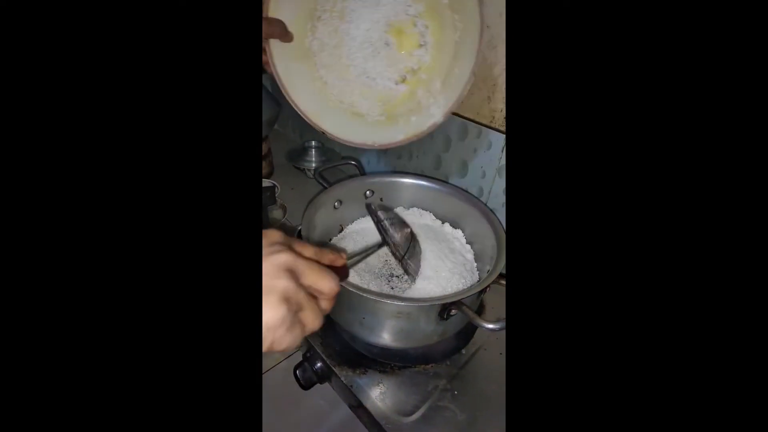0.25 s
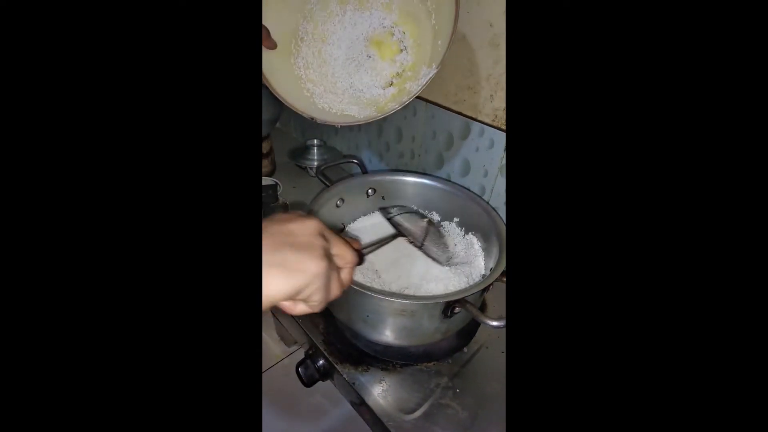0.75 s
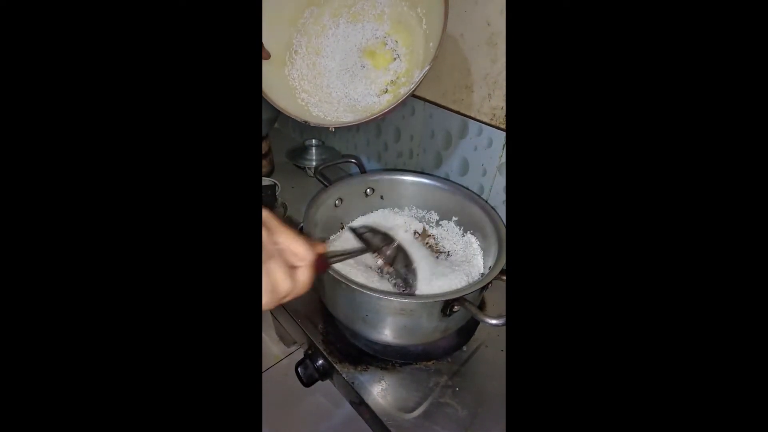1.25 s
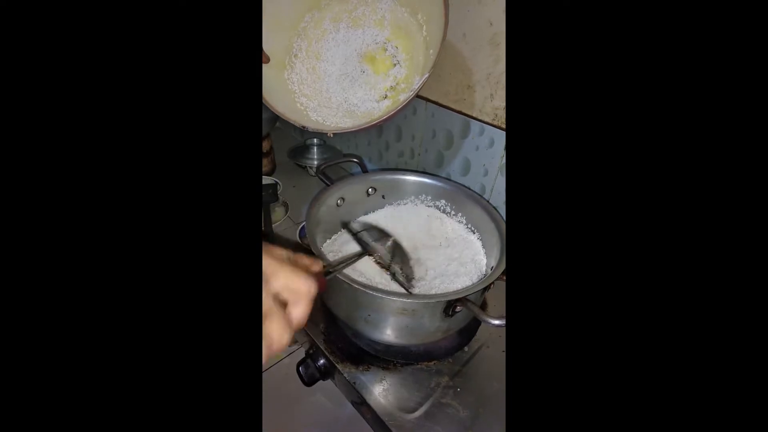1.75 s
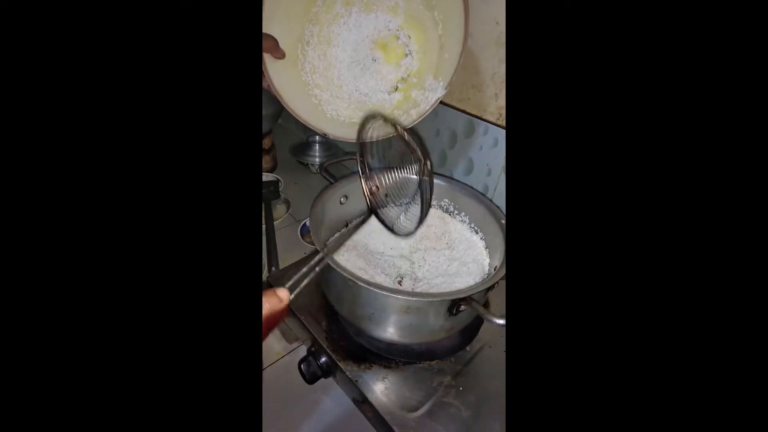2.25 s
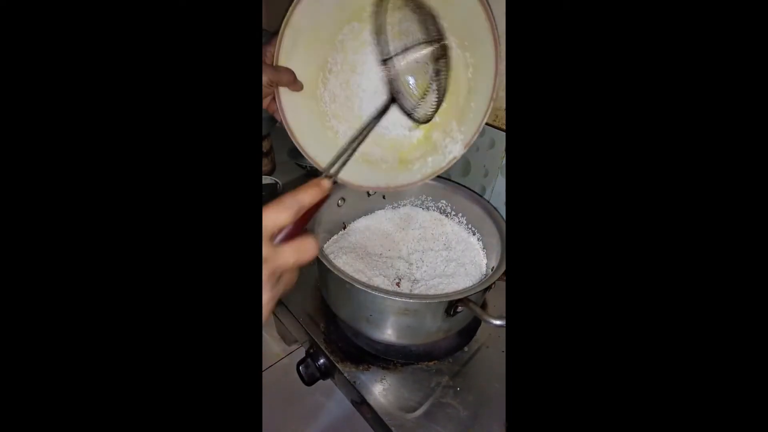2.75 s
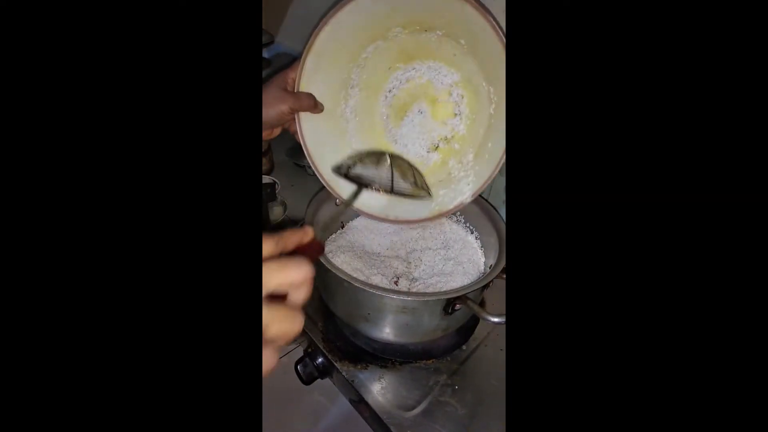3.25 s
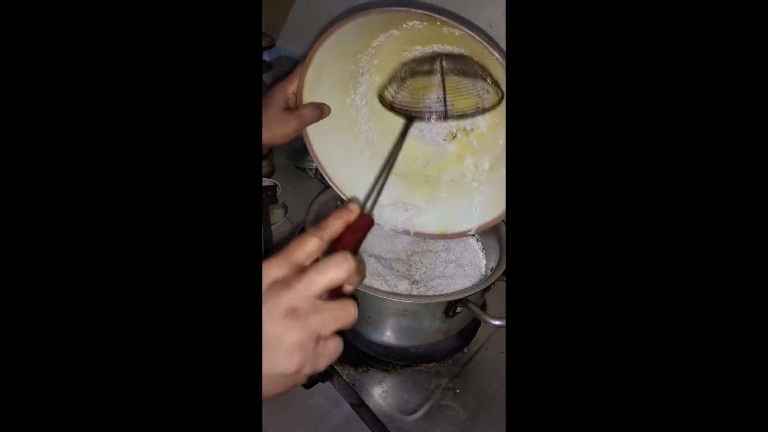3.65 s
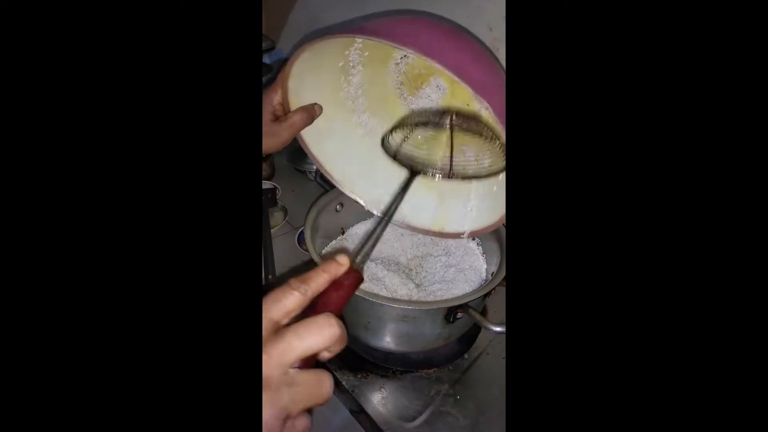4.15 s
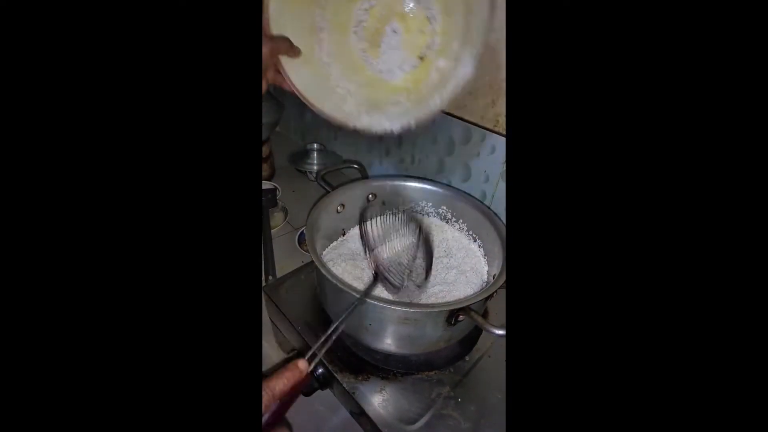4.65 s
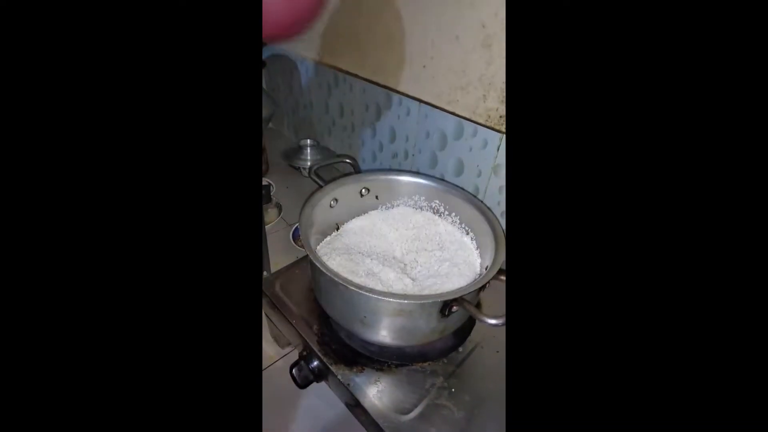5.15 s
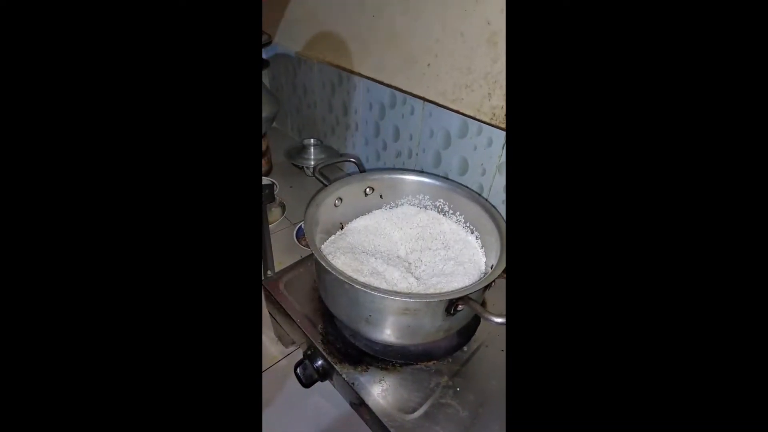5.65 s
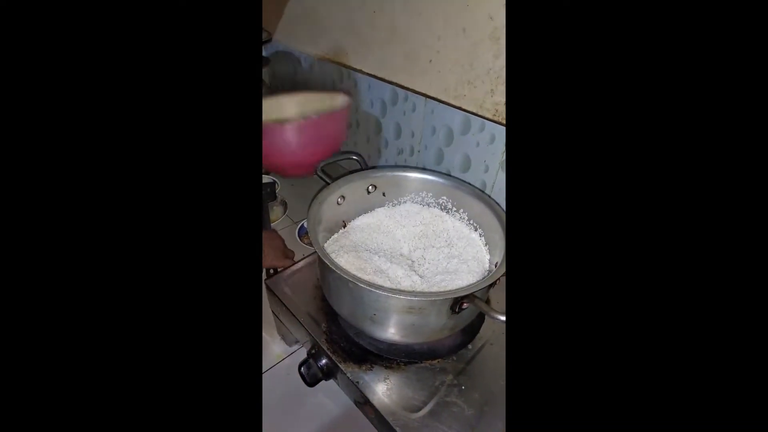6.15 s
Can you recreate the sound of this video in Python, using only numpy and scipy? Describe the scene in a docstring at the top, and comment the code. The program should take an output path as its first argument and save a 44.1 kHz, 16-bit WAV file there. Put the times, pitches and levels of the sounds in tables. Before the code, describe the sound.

Wet rice and spices fry noisily in a steel pot on a gas stove, full of fine spitting clicks and tiny bubble pings. A wire-mesh ladle stirs lightly, bangs the rim twice with a jingling clang, scratches a plastic bowl, then bangs twice again. The sizzle gradually weakens, leaving soft burner roar and a few last clicks. Close stereo pickup, small reflective kitchen.

```python
"""In a small hard kitchen, rice and spices fry in a steel pot on a gas stove, near a phone with two microphones.
The burner roars softly (shaped noise) with hollow tones (resonances) and a low hum (a wavering sine).
A wire ladle stirs, is knocked clean on the rim and scrapes a plastic bowl: uneven clicks set pot, mesh and
bowl ringing, and low notes, squeaks, snaps and ticks are short fading tones or noises.
Steam bubbles burst in the frying oil: thousands of small clicks and short rising pings."""
import sys
import numpy as np
from scipy import signal
from scipy.fft import rfft, irfft
from scipy.io import wavfile
from scipy.ndimage import uniform_filter1d

SR = 44100
rng = np.random.default_rng(int(sys.argv[2]) if len(sys.argv) > 2 else 0)


def master_out(mix):
    """Clip the mix to full scale and print it as 16-bit PCM to the path in sys.argv[1]."""
    frames = np.transpose(np.atleast_2d(mix))
    ceiling = np.clip(frames, -1, 1)
    pcm = np.round(ceiling * 32767).astype(np.int16)
    wavfile.write(sys.argv[1], SR, pcm)


N = 282240  # samples in the scene


def undb(db):
    """Turn decibels into a plain gain."""
    return 10 ** (np.asarray(db) / 20)


def unit(x):
    """Scale to an average (RMS) level of 1."""
    return x / np.sqrt(np.mean(x ** 2))


def curve(rows):
    """Draw lines through a table that starts with t/s; gives each other column at every sample."""
    s, *columns = np.transpose(rows)
    t = np.arange(N) / SR
    return [np.interp(t, s, c) for c in columns]


def along(points, column=1):
    """Read a column of a table that starts with f/Hz at every frequency of the spectrum."""
    p = np.array(points, float)
    hz = np.arange(N // 2 + 1) * SR / N
    return np.interp(np.log(hz + 1), np.log(p[:, 0]), p[:, column])


def colour(x, points):
    """Give a sound the tone colour of an f/Hz, level/dB table."""
    return unit(irfft(rfft(x) * undb(along(points)), N))


def band(x, lo_hz, hi_hz, order=2):
    """Keep mainly the pitches between two edges."""
    return signal.sosfilt(signal.butter(order, [lo_hz, hi_hz], "band", fs=SR, output="sos"), x)


def ring(x, modes):
    """Let a sound excite several resonances, neighbours in opposite sign."""
    total = 0
    for k, (hz, width_hz, db) in enumerate(modes):
        resonance = signal.lfilter(*signal.iirpeak(hz, hz / width_hz, SR), x)
        total = total + (-1) ** k * undb(db) * resonance
    return unit(total)


def walk(rate):
    """Wander at random: levels held for 1 / rate s, then smoothed twice; spread 1."""
    k = int(SR / rate)
    steps = np.repeat(rng.standard_normal(N // k + 1), k)
    return unit(uniform_filter1d(uniform_filter1d(steps, k), k)[:N])


def grains(per_s, spread_db, smear_s):
    """Clicks of very unequal size with short noisy tails; both paths share the clicks but not the noise."""
    loudness = np.minimum(rng.exponential(size=N), 4.5)
    size = (rng.random(N) < per_s / SR) * undb(spread_db * loudness)
    power = signal.lfilter([1], [1, -np.exp(-1 / (smear_s * SR))], size ** 2)
    return unit(np.sqrt(power) * rng.standard_normal((2, N)))


def burst(t0, db, rise_s, hold_s, t60):
    """Loudness shape of one event: quick rise, plateau, then a decay of 60 dB in t60 seconds."""
    out, first = np.zeros(N), int(t0 * SR) + 1
    t = np.arange(first, min(N, first + int((hold_s + 2 * t60) * SR))) / SR - t0
    decay_db = 60 * np.maximum(t - hold_s, 0) / t60
    out[first:first + len(t)] = undb(db - decay_db) * (1 - np.exp(-t / rise_s))
    return out


# Tone colour of the gas roar: f/Hz, level/dB (per Hz)
ROAR_TONE = [(15, -57), (30, -15), (87, -3), (141, 0.5), (224, -5), (251, -4.5), (357, -1.5), (477, -32),
             (510, -12), (969, -4.5), (1410, -8), (1610, 3), (5000, -19.5), (6500, -82), (11000, -120)]
# Level of the gas roar, before its random wander: t/s, level/dB
ROAR_LEVEL = [(0.0, -47.5), (1.2, -46), (2.0, -45.5), (3.5, -45.5), (5.0, -47), (5.7, -46), (6.4, -43.5)]


def gas_roar(noise):
    """Burning gas gives a steady noise whose level wanders a little."""
    return undb(curve(ROAR_LEVEL)[0] + 1.8 * walk(6)) * colour(noise, ROAR_TONE)


# Hollow tones under the pot, before their random wander: f/Hz, width/Hz, level/dB
FLAME_TONES = [(128, 9.6, -61.5), (359, 14, -72), (458, 16, -59), (514.7, 24, -58), (1027, 67, -58.5)]


def flame_tones(noise):
    """The roar's noise excites a few hollow resonances, each wavering in level."""
    return sum(undb(db + 2.5 * walk(7.9)) * ring(noise, [(hz, width, 0)]) for hz, width, db in FLAME_TONES)


# One hollow tone that comes and goes: t/s, level/dB
HOLLOW_LEVEL = [(0.0, -63), (0.27, -48.5), (0.33, -63), (0.46, -59), (0.52, -46.5), (0.72, -52.5),
                (1.1, -52), (1.3, -57), (1.4, -59.5), (1.94, -56), (3.6, -56.5), (5.3, -61.5), (6.4, -61)]


def hollow_tone(noise):
    """The same noise passes through two close resonances, one after the other."""
    narrow = ring(noise, [(259.7, 12.5, 0)])
    return undb(curve(HOLLOW_LEVEL)[0]) * ring(narrow, [(276, 51, 0)])


# Level of the low hum, before swells and random wander: t/s, level/dB
HUM_LEVEL = [(0.0, -54), (0.18, -69), (0.3, -58), (0.55, -71), (0.66, -52), (0.85, -52), (1.01, -67),
             (1.22, -62), (1.32, -50), (1.55, -49), (1.72, -67), (2.1, -73), (3.12, -57), (3.4, -65),
             (3.9, -49), (4.1, -63), (4.6, -55), (5.6, -66), (6.4, -61)]
HUM_HZ = 89.7
HARD_BLOW_DB, SWELL_DB = -33, -21  # thuds above the first start a swell; swell against the thud
SWELL_RISE_S, SWELL_HOLD_S, SWELL_T60_S = 0.16, 0.19, 0.53


def hum():
    """A sine wavers in pitch and level; hard blows and rocking of the pot make it swell."""
    blows = [(row[0], row[2]) for row in KNOCKS if row[2] > HARD_BLOW_DB]
    blows += [row[:2] for row in ROCKING]
    swell = sum(burst(s, db + SWELL_DB, SWELL_RISE_S, SWELL_HOLD_S, SWELL_T60_S) for s, db in blows)
    level = (undb(curve(HUM_LEVEL)[0]) + swell) * undb(2.2 * walk(11))
    turns = np.cumsum(HUM_HZ * (1 + 0.015 * walk(14))) / SR
    return level * np.sqrt(2) * np.sin(2 * np.pi * turns)


def burner():
    """Gas roar and hollow tones come from one shared noise, with the low hum added."""
    noise = rng.standard_normal((2, N))
    return gas_roar(noise) + flame_tones(noise) + hum() + hollow_tone(noise)


# The wire squeaks on the bowl: t/s, level/dB, f/Hz, length/s
SQUEAKS = [(4.218, -36.5, 1700, 0.028), (4.224, -39, 2600, 0.012), (4.278, -32.5, 1817, 0.015),
           (4.34, -35, 1760, 0.013)]


def squeaks():
    """Rubbing wire gives nearly pure notes whose pitch wavers slightly."""
    t, waver = np.arange(N) / SR, np.cumsum(walk(150)) / SR
    out = 0
    for s, db, hz, length in SQUEAKS:
        note = np.sqrt(2) * np.sin(2 * np.pi * hz * (t + 0.0134 * waver))
        out = out + burst(s, db, 0.003, length, 0.045) * note
    return out


# Strokes of the ladle over the bowl: t/s, length/s, wall level/dB, rasp level/dB, scratch level/dB
SCRAPES = [(2.921, 0.064, -40.5, -39, -37), (2.996, 0.084, -49, -59, -49), (3.091, 0.07, -43, -35, -39),
           (3.157, 0.14, -40, -39.5, -39), (3.631, 0.087, -41.5, -42, -43), (3.704, 0.018, -28, -30, -29),
           (3.809, 0.031, -28.5, -32, -35), (3.868, 0.097, -49, -35, -41.5), (4.19, 0.16, -49, -41, -38)]
# Drumming of the bowl wall: f/Hz, width/Hz, level/dB
BOWL_WALL = [(210, 130, -4.5), (300, 83, 1.5), (474, 40, 3), (638, 86, 0.5)]
# Rasp of the bowl: f/Hz, width/Hz, level/dB
BOWL_RASP = [(1640, 100, -7), (1735, 570, 11), (2180, 190, 7)]
# Scratch above the rasp: f/Hz, width/Hz, level/dB
BOWL_SCRATCH = [(2590, 110, 10), (2740, 22, 16), (3050, 150, 5), (3600, 260, 7), (4430, 190, 7)]
SCRAPE_RISE_S, SCRAPE_T60_S = 0.012, 0.22


def scrapes():
    """Wire catches and slips on plastic: uneven clicks drive the bowl's resonances."""
    slips = grains(900, 2.2, 0.002)
    parts = [ring(slips, modes) for modes in (BOWL_WALL, BOWL_RASP, BOWL_SCRATCH)]
    out = 0
    for s, length, *levels in SCRAPES:
        for db, part in zip(levels, parts):
            out = out + burst(s, db, SCRAPE_RISE_S, length, SCRAPE_T60_S) * part
    return out


# Single low notes of pot and bowl, ringing at and after knocks and scrapes: t/s, level/dB, f/Hz, t60/s
LOW_NOTES = [(0.766, -32, 255, 0.14), (0.770, -33, 450, 0.073), (0.806, -38, 465, 0.073),
             (1.174, -34.5, 384, 0.34), (1.176, -40.5, 219, 0.18), (1.212, -43, 615, 0.82),
             (2.141, -18, 728, 0.067), (2.203, -23, 312, 0.14), (2.154, -28, 304, 0.34),
             (2.461, -27, 399, 0.28), (2.165, -30, 768, 0.34), (2.215, -28, 666, 0.5),
             (2.465, -31, 808, 0.36), (2.545, -22, 320, 0.18), (2.55, -46, 680, 0.43),
             (4.765, -24, 301, 0.34), (4.815, -31, 613, 0.44), (3.826, -31, 643, 0.29),
             (3.855, -38, 647, 0.13), (4.963, -26, 290, 0.18), (2.441, -22.5, 700, 0.08),
             (2.502, -26, 297.6, 0.34), (3.184, -37, 302, 0.07), (3.198, -45, 282, 0.065),
             (3.232, -33, 620, 0.18), (3.269, -35, 322, 0.11), (3.702, -30.5, 126, 0.3),
             (3.822, -26.5, 303, 0.28), (4.186, -27, 195, 0.046), (4.189, -35, 390, 0.11),
             (4.252, -29, 250, 0.078), (4.718, -32, 586, 0.089), (4.734, -26.5, 582, 0.32),
             (4.733, -27.5, 301.5, 0.3), (4.952, -26.5, 530, 0.15), (4.979, -20.5, 470, 0.2),
             (2.66, -35, 301, 0.32), (2.7, -38, 399, 0.26), (5.11, -32, 473, 0.2), (5.15, -30, 301, 0.3),
             (5.550, -28, 504, 0.09), (5.592, -29.5, 505, 0.13), (6.256, -44, 400, 0.1),
             (6.29, -46, 432, 0.08)]


def low_notes():
    """Each is one low fading note, a quarter turn apart on the two paths."""
    t, paths = np.arange(N) / SR, np.array([[0], [np.pi / 2]])
    out = 0
    for s, db, hz, t60 in LOW_NOTES:
        note = np.sqrt(2) * np.sin(2 * np.pi * hz * (t - s) + paths)
        out = out + burst(s, db, 0.00081, 0, t60) * note
    return out


# Sharp clicks of wire on pot and bowl, level before the fade: t/s, level/dB, f/Hz
SNAPS = [(2.4315, -12, 6100), (2.432, -9, 8200), (4.711, -14, 6400), (4.947, -11, 6300), (6.11, -30, 2500),
         (6.216, -28, 1700), (6.302, -34, 2000), (3.11, -27, 2030), (3.152, -19, 2600), (3.176, -27, 4430),
         (3.7014, -15.5, 327), (3.702, -13, 3600), (3.702, -17, 2050), (3.721, -23, 2050),
         (3.726, -28, 1630), (3.836, -25, 1710), (4.187, -23, 1700), (4.187, -23, 2800), (4.233, -28, 1700),
         (5.501, -21, 1390), (5.551, -15, 2100), (5.551, -18, 5900), (5.568, -20, 5780)]
SNAP_CYCLES = 1.6  # the fade falls to 37 % in this many cycles


def snaps():
    """A hard contact gives a couple of cycles, gone at once."""
    out = np.zeros(N)
    for s, db, hz in SNAPS:
        cycles = np.arange(int(8 * SR / hz)) * hz / SR
        click = undb(db) * np.sin(2 * np.pi * cycles) * np.exp(-cycles / SNAP_CYCLES)
        out[int(s * SR):int(s * SR) + len(click)] += click
    return out


# Small ticks and pings, alone or within knocks and scrapes, level before the common gain of 0.62:
# t/s, level/dB, f/Hz, t60/s
TICKS = [(0.049, -32, 8380, 0.059), (0.688, -21, 9000, 0.055), (0.9294, -21, 7700, 0.05),
         (1.164, -18.5, 4530, 0.06), (1.164, -20, 5400, 0.06), (2.0368, -17, 7350, 0.044),
         (2.197, -18, 2200, 0.028), (2.197, -15, 1850, 0.026), (2.431, -16, 6140, 0.061),
         (2.7382, -34, 7400, 0.019), (3.11, -27, 2550, 0.069), (3.1502, -27, 2580, 0.26),
         (3.9828, -30, 1700, 0.072), (5.55, -21, 5930, 0.088), (3.195, -28, 4440, 0.15),
         (4.4258, -26, 6300, 0.21), (5.9094, -26, 6400, 0.18), (0.845, -23, 5870, 0.05),
         (1.344, -24, 4270, 0.04), (1.512, -28, 4380, 0.036), (1.795, -23, 5820, 0.04),
         (0.745, -35, 2280, 0.08), (0.926, -30, 2400, 0.05), (6.256, -40, 1450, 0.12),
         (6.287, -36, 1600, 0.15), (6.29, -35, 2000, 0.12)]


def ticks():
    """Each is a short fading burst of noise in a narrow band around one pitch."""
    noise = rng.standard_normal((2, N))
    out = 0
    for s, db, hz, t60 in TICKS:
        narrow = unit(band(noise, hz / 1.072, hz * 1.055))
        out = out + burst(s, db, 0.00036, 0.0017, t60) * 0.62 * narrow
    return out


# Ladle knocks: t/s, mesh jingle level/dB, thud level/dB, clank level/dB, crack level/dB (before its filter),
# rattle time/s, then middle and upper pot ring against the thud: level/dB, level/dB
KNOCKS = [(0.742, -45, -35.5, -41, -24.5, 0.014, 6, -1.5), (1.161, -30, -35.5, -35.5, -25, 0.069, -4, 2),
          (2.129, -25, -17.5, -28.5, -47, 0.12, 3.5, 1.5), (2.431, -26, -19, -26.5, -40, 0.1, 1, 1.5),
          (3.701, -39, -32.5, -28, -17, 0.019, 0, 6.5), (3.819, -43, -47, -39, -33, 0.022, -8, 3),
          (4.185, -58, -33.5, -35, -28, 0.006, -13, -10), (4.71, -25, -21.5, -30, -37, 0.061, 1, 2.5),
          (4.942, -26, -24, -29.5, -48, 0.077, 5.5, -1), (5.499, -35, -37, -32, -25, 0.027, -1, 3.5),
          (5.548, -29.5, -41.5, -32.5, -16.5, 0.04, -8, 6.5), (6.252, -56, -51, -44, -34, 0.024, 5, -10)]
# The pot rocks on after the second blow of a pair: t/s, thud level/dB, clank level/dB, length/s
ROCKING = [(2.59, -35.5, -45, 0.038), (5.069, -32, -39, 0.085)]
# Low ring of the pot: f/Hz, width/Hz, level/dB
POT_RING = [(133.5, 12, -5), (252.6, 37, 3), (302.6, 10.4, 8.5), (352.7, 13.6, 1.5), (396, 21, -3.5),
            (454.5, 10, 4), (564, 67, -11), (615, 24, -3), (666, 32, -5.5), (762, 62, -4.5),
            (864, 17, -18.5)]
# Clank of the rim: f/Hz, width/Hz, level/dB
RIM_RING = [(1051, 36, 4), (1255, 30, 6), (1359, 25, 9), (1550, 55, 4.5), (1753, 42, 5), (1967, 33, 2.5),
            (2215, 37, 9.5), (2417, 61, 0.5), (2740, 53, 3), (3110, 70, 3)]
# Tone colour of the mesh: f/Hz, level/dB (per Hz)
MESH_TONE = [(1650, -12.5), (2800, -43), (3310, -1), (4170, 9), (5370, -3), (5950, -5), (8420, 7.5),
             (11300, -28), (12400, -11), (15800, -20)]
# Ring of the mesh wires: f/Hz, width/Hz, level/dB
WIRE_RING = [(3920, 81, -32), (4930, 70, 7.5), (5864, 370, 4), (6460, 81, 12), (6760, 380, 0),
             (8080, 390, 9.5), (8820, 370, 5.5), (9420, 840, 2)]
# Tone colour of the thud: f/Hz, level/dB (per Hz)
THUD_TONE = [(24, -50), (40, -20), (102, 10), (186, -7), (285, -4), (447, 0), (1350, -6), (1450, -22),
             (2190, 6.5), (3500, -35), (4550, -51), (7700, -120)]
# Edges of the deep, middle and upper pot ring: f/Hz
POT_EDGES = 30, 375, 520, 1500
THUD_LAG, THUD_RISE = 0.14, 0.045  # shares of the rattle time, stretched for each part below
THUD_T60_S, JINGLE_T60_S = 0.5, 0.23
ROCK_RISE_S, ROCK_T60_S = 0.032, 0.37


def knocks():
    """The mesh cracks and jingles at once; pot and stove top shudder a moment later and rattle on."""
    # loudness of each part over time
    jingle, ping, upper, middle, deep, clank, crack = 0, 0, 0, 0, 0, 0, 0
    for s, jingle_db, thud_db, clank_db, crack_db, rattle, middle_db, upper_db in KNOCKS:
        lag, rise = THUD_LAG * rattle, THUD_RISE * rattle
        crack = crack + burst(s, crack_db, 0.00036, 0.0007, 0.078)
        ping = ping + burst(s, jingle_db + 6.5, 0.00046, 0.0063, 0.34)
        jingle = jingle + burst(s, jingle_db, 0.0055, 0.71 * rattle, JINGLE_T60_S)
        upper = upper + burst(s + lag, thud_db + upper_db, rise, rattle, THUD_T60_S)
        middle = middle + burst(s + 1.5 * lag, thud_db + middle_db, 12.0 * rise, 0.89 * rattle, THUD_T60_S)
        # the lowest ring builds up slowly
        deep = deep + burst(s + 0.41 * lag, thud_db, 15 * rise, 0.86 * rattle, 1.11 * THUD_T60_S)
        clank = clank + burst(s + lag, clank_db, 1.3 * rise, 0.65 * rattle, 0.92 * THUD_T60_S)
    for s, thud_db, clank_db, length in ROCKING:
        rock = burst(s, thud_db, ROCK_RISE_S, length, ROCK_T60_S)
        upper, middle, deep = upper + undb(2) * rock, middle + rock, deep + rock
        clank = clank + burst(s, clank_db, ROCK_RISE_S, length, ROCK_T60_S)

    # sound of each part
    shake = grains(1200, 1.2, 0.004)
    chatter = grains(700, 1.6, 0.004)
    pot = unit(ring(shake, POT_RING) + undb(-8) * colour(shake, THUD_TONE))
    deep_pot, middle_pot, upper_pot = (band(pot, lo, hi) for lo, hi in zip(POT_EDGES, POT_EDGES[1:]))
    rim = unit(ring(shake, RIM_RING) + undb(-5) * unit(band(chatter, 670, 3100)))
    wires = ring(chatter, WIRE_RING)
    mesh = unit(colour(chatter, MESH_TONE) + undb(-5) * wires)
    strike = 1.03 * band(crack * rng.standard_normal((2, N)), 170, 6500, order=1)

    pot_sound = deep * deep_pot - middle * middle_pot + upper * upper_pot
    return strike + ping * wires + jingle * mesh + pot_sound + clank * rim


PINGS_PER_S, PING_T60_S = 1200, 0.14
PING_GLIDE = 0.083  # share by which the pitch would rise in one t60; each note is cut sooner


def pings():
    """Small bubbles: short fading notes from 1.2 to 15.6 kHz, each rising a little in pitch."""
    at, pitch, size, phase_a, phase_b = rng.random((int(PINGS_PER_S * N / SR), 5)).T
    k = np.arange(1500)  # samples in a note
    fade = k / (PING_T60_S * SR)
    hz = 1200 * 13 ** pitch
    turn = 2 * np.pi * hz[:, None] * k / SR * (1 + PING_GLIDE * fade / 2)
    loudness = np.sqrt(hz) * undb(-2.0 * np.log(size + 0.0092))  # a few are much louder
    shape = undb(-60 * fade) * (1 - np.exp(-k / 40)) * (1 - k / len(k))
    gain = loudness[:, None] * shape
    where = ((at * N).astype(int)[:, None] + k).ravel()
    paths = []
    for phase in (phase_a, phase_b):
        notes = gain * np.sin(turn + 2 * np.pi * phase[:, None])
        paths.append(np.bincount(where, notes.ravel(), N)[:N])
    return unit(np.array(paths))


def flicker(rate):
    """A random wander without its slow part."""
    x = walk(rate)
    return unit(x - uniform_filter1d(x, int(4 * SR / rate)))


# Level of the frying between 5 and 10 kHz, before colour and flicker: t/s, level/dB
FRY_LEVEL = [(0.0, -35), (0.05, -33), (0.11, -34.5), (0.2, -32), (0.31, -21.5), (0.47, -22.5), (0.55, -25),
             (0.63, -22), (0.69, -21), (0.82, -25), (0.9, -21.5), (1.26, -23), (1.41, -22.5), (1.58, -28),
             (1.88, -21.5), (2.02, -25), (2.2, -25.5), (2.41, -26), (2.6, -24), (2.75, -28), (2.85, -28),
             (2.95, -31.5), (3.15, -28.5), (3.37, -32.5), (3.9, -33), (4.3, -33.5), (4.64, -32.5),
             (5.28, -34), (6.4, -34)]
# Tone colour of the frying: f/Hz, level/dB (per Hz)
FRY_TONE = [(350, -75), (600, -15.5), (853, -18), (1060, -10), (1280, -18.5), (1570, -13), (2200, -9.5),
            (3340, -6), (3670, -10.5), (3980, -5), (5010, -6.5), (7840, 2.5), (15200, -11.5)]
# Changing colour against the main hiss: t/s, level/dB above 10.5 kHz, level/dB below 4.6 kHz
FRY_COLOUR = [(0.0, 4, 5), (0.15, 2.5, 2), (0.35, 1, -3), (0.57, 5, -3), (0.69, -4, -2), (0.8, 5.5, -1),
              (1.0, 2, -4.5), (1.35, 3.5, -2), (1.55, 1.5, 3.5), (1.9, 0, 0), (2.35, -0.5, 2.5),
              (2.85, -1, 1), (3.4, -2, 1), (4.1, 0, -1), (4.6, -1.5, 1.5), (5.4, -4.5, 2.5), (6.4, -5.5, 1)]


def frying():
    """Steam bubbles burst: big ones click across the range, small ones ping near their own pitch."""
    level_db, (bright_db, full_db) = curve(FRY_LEVEL)[0], curve(FRY_COLOUR)
    clicks = grains(3500, 1.3, 0.002) + undb(-13) * grains(90, 2.5, 0.0003)
    clicks = clicks + undb(-1) * pings()
    centres = np.geomspace(700, 15500, num=13)  # Hz, overlapping bands
    out, tone = 0, undb(along(FRY_TONE))
    for hz, share in zip(centres, np.eye(len(centres))):
        tilt_db = bright_db if hz > 10500 else full_db if hz < 4600 else 0
        mix = clicks + undb(3) * grains(1400, 1.6, 0.002)  # each band also has clicks of its own
        slopes = along(np.transpose([centres, share]))  # over all bands these sum to one
        part = irfft(rfft(mix) * tone * slopes, N)
        flicker_db = (1.8 if hz > 10500 else 0.7) * flicker(14)
        out = out + undb(tilt_db + flicker_db) * part
    hiss = band(out, 5000, 10000)
    return undb(level_db) * out / np.sqrt(np.mean(hiss ** 2))


def scene():
    """All sources together, on two paths."""
    return burner() + squeaks() + scrapes() + low_notes() + snaps() + ticks() + knocks() + frying()


# The two microphones, before the drift: f/Hz, left minus right level/dB, likeness (0-1)
MICROPHONES = [(30, -8, 0.85), (80, -5, 0.97), (367, -3, 0.85), (570, -1, 0.1), (950, -5.5, 0.36),
               (1710, 0.5, 0.05), (2980, -3.5, 0.25), (5500, -5, 0.07), (5960, 6.5, 0), (6970, -9, 0.34),
               (8560, -11.5, 1), (9800, -8, 0.64), (11800, -7, 0.64), (14000, -3, 0.4)]
# Slow drift of the balance, added to the above: t/s, left minus right level/dB
BALANCE_DRIFT = [(0.0, 3), (1.7, 4), (2.3, 5), (3.2, 4), (4.2, 4.5), (5.2, 4), (6.4, 3.5)]
TOP_HZ = 15900


def record(dry):
    """The microphones share part of the sound and differ in colour; peaks are rounded and the top is cut."""
    a, b = rfft(dry)
    left, like = undb(along(MICROPHONES)), np.clip(along(MICROPHONES, column=2), 0, 1)
    pair = np.array([left * (like * a + np.sqrt(1 - like ** 2) * b), a])
    pair = irfft(2 * pair / np.sqrt(1 + left ** 2 + 2 * left * like), N)  # their mean keeps its level
    pair = pair * undb(np.outer([0.5, -0.5], curve(BALANCE_DRIFT)[0]))
    rounded = 0.85 * np.tanh(pair / 0.92)
    return signal.sosfilt(signal.ellip(10, 0.2, 80, TOP_HZ, fs=SR, output="sos"), rounded)


dry = scene()
out = record(dry)
master_out(out)
```